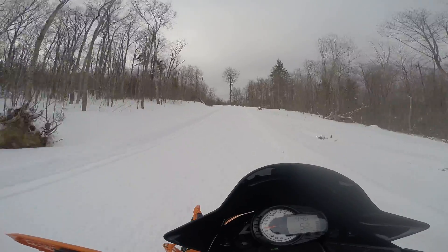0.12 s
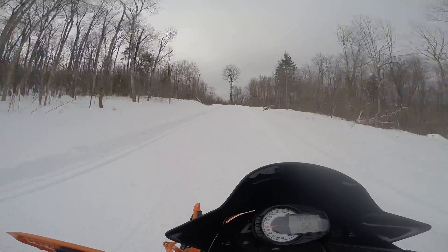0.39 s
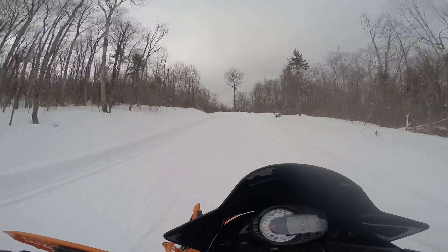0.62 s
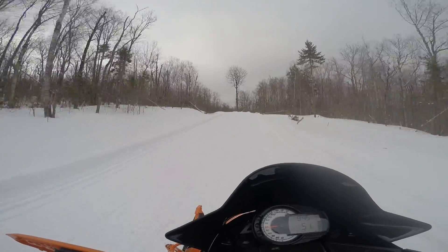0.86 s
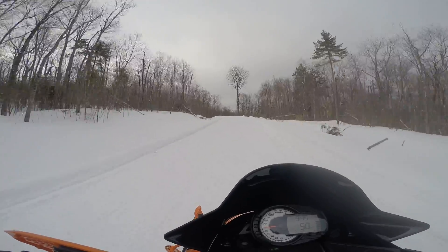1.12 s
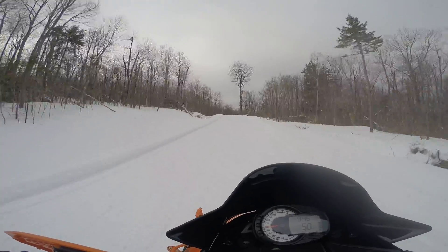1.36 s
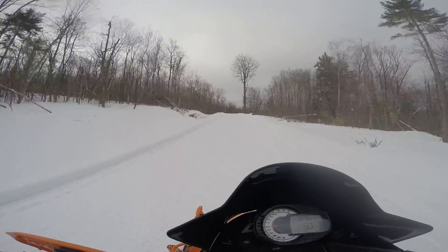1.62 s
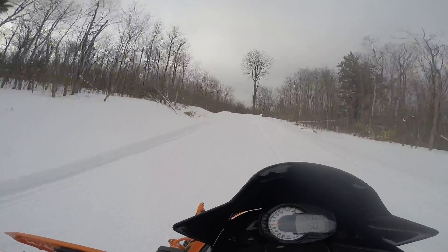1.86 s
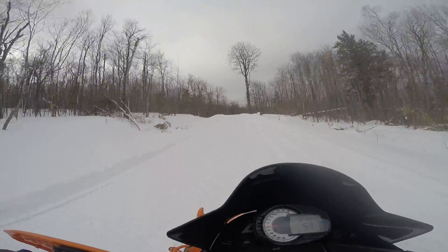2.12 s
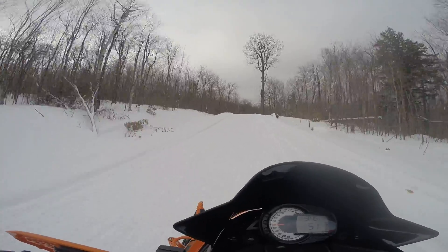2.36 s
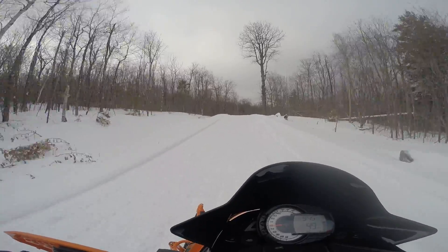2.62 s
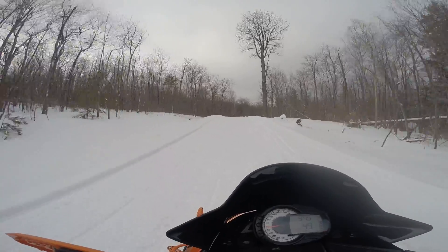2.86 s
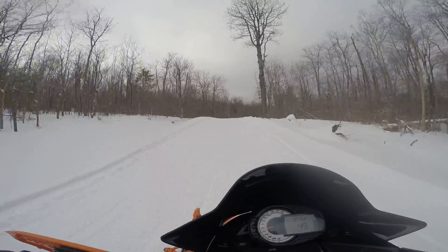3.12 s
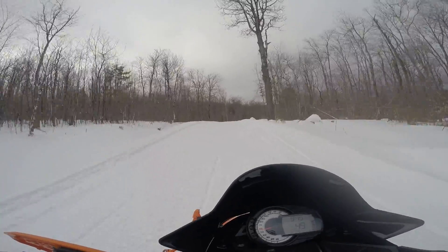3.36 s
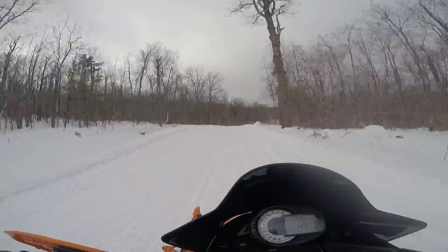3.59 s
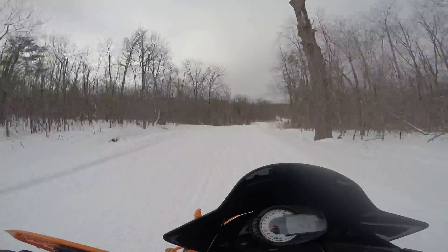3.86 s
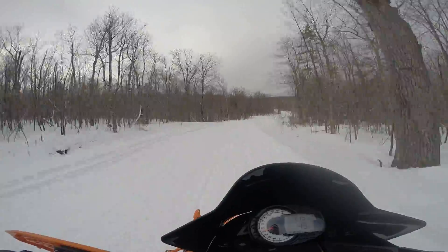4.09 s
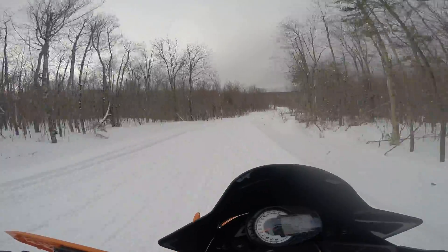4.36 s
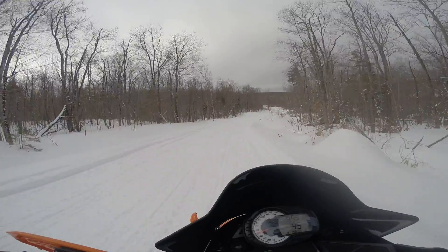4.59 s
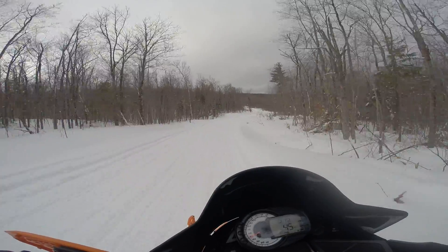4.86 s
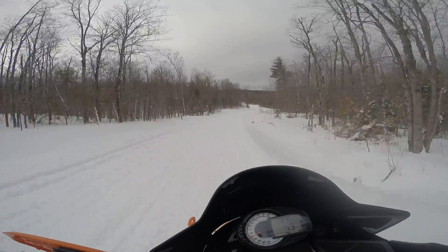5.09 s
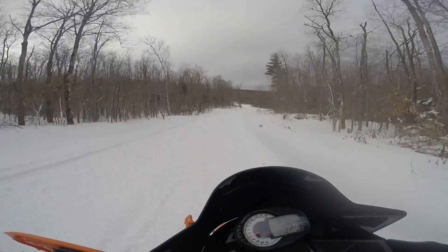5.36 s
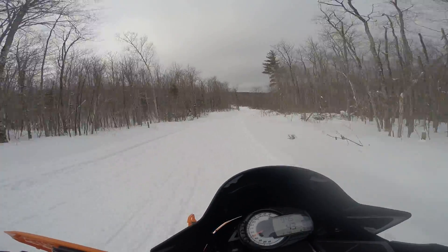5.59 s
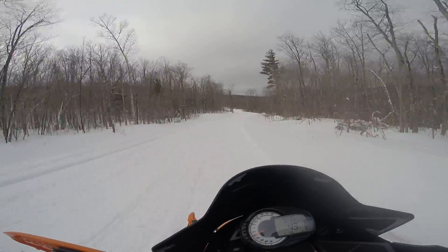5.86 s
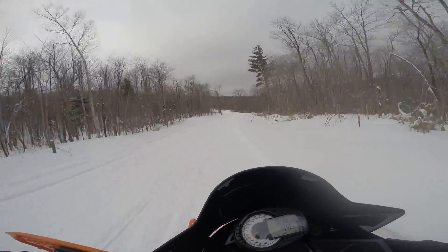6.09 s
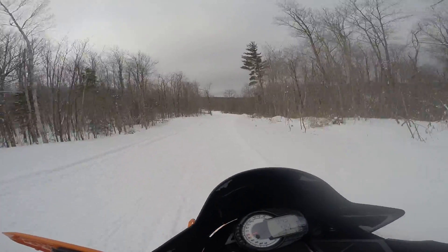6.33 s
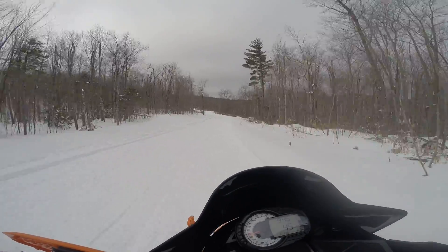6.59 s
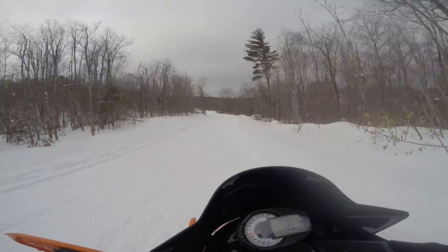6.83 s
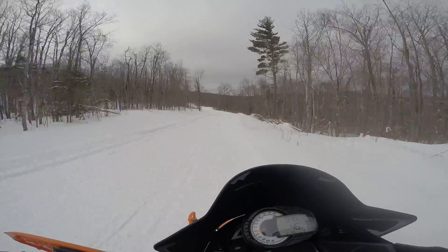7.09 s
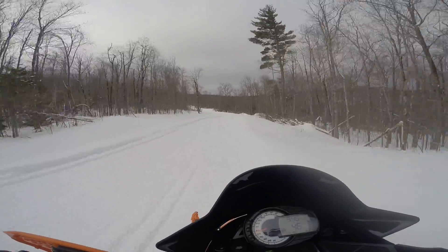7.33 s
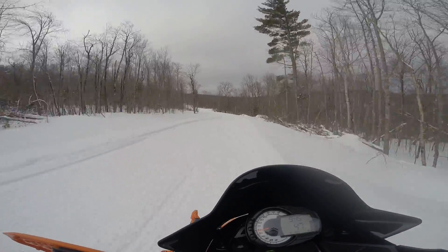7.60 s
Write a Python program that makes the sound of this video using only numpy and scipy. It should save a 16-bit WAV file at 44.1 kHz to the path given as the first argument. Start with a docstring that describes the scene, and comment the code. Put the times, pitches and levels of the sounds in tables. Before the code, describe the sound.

A two-stroke snowmobile is already cruising as the sound begins, heard through a sealed camera housing on the rider: dense low drone, boxy boom, throaty midrange rasp, soft hiss and buffeting wind. Track lugs hum and the drive whines faintly. Brittle little ticks and short chatters come from a loose mount, especially from 1.7 to 3 s. Bumps knock at about 0.6, 1.2, 2.1, 3.1 and 3.3 s. Pitch rises slightly near 1.5 s, then sags from 3 s. At about 3.6 s the throttle closes: roar and wind thin, leaving a lower, clean, prominent hum, lowest around 5.1 s with tiny stutters and a gust. Fine chatter buzzes at 5.4-5.8 s as revs climb. Near 5.9 s the rough roar returns with stronger whine, gusts and ticks; jolts hit at 6.2 and, hardest, 7.1 s. Cruising continues until an abrupt end at 7.7 s.

```python
"""Snowmobile on a snowy trail

A two-stroke twin, heard by a camera in a sealed housing on the rider. The throttle closes and reopens.
Wind, housing boom, body rumble, roar and hiss are filtered noise; the roar also holds crank overtones.
Crank tones, track lugs and drive whine are unsteady sines gliding on tabled speeds.
Trail jolts are impulses with decaying noise; the loose camera mount ticks in short bursts of ringing."""
import sys
import numpy as np
from scipy import signal
from scipy.fft import rfft, irfft, next_fast_len
from scipy.io import wavfile
from scipy.ndimage import uniform_filter1d, minimum_filter1d, map_coordinates

SR = 44100
rng = np.random.default_rng(int(sys.argv[2]) if len(sys.argv) > 2 else 0)


def convert_level_to_amplitude(level_db):
    """Map a level in decibels to its linear amplitude factor."""
    exponent = np.asarray(level_db, float) / 20
    return 10 ** exponent


def materialize(psi):
    """Save the field psi as 16-bit PCM at rate SR to the path in sys.argv[1].

    A 1-D psi becomes a single channel; in a 2-D psi each row is a channel.
    """
    bounded = np.clip(np.atleast_2d(psi).T, -1, 1)
    quanta = np.round(bounded * 32767).astype(np.int16)
    wavfile.write(sys.argv[1], SR, quanta)


N = 339999  # samples

# wind and housing spectra: freq_hz, relative_db
WIND_SPECTRUM = [(12, -26.5), (22, -11.5), (32, -1.5), (46, 3), (65, -6.5), (90, -4.5), (125, -9.5),
                 (200, -36)]
BOOM_SPECTRUM = [(80, -20.5), (120, -12), (140, -1), (165, 9), (185, 3), (220, -7.5), (290, -14),
                 (340, -16.5), (420, -28.5), (520, -45.5)]
BODY_SPECTRUM = [(250, -25), (350, 9), (430, 3), (550, -3), (680, 1.5), (800, -2), (960, -7.5),
                 (1200, -42.5)]
# engine noise spectra as they reach the microphone: freq_hz, relative_db
ROAR_SPECTRUM = [(900, -40), (970, -34.5), (1050, -12.5), (1150, -13), (1250, -6), (1370, -0.5),
                 (1600, -4.5), (1800, -6), (2000, -14.5), (2200, -14), (2500, -22.5), (3100, -27.5),
                 (3500, -37.5), (4200, -53)]
EDGE_SPECTRUM = [(1850, -28.5), (2050, -8.5), (2200, 4), (2400, -1), (2800, -10.5), (3100, -17),
                 (3500, -31.5)]
HISS_SPECTRUM = [(2800, -17.5), (3500, -1), (4300, -3.5), (4730, -0.5), (5100, -4.5), (5600, 2), (6300, -4),
                 (7300, -6.5), (7800, -13), (10000, -14.5), (11500, -23), (12900, -27.5), (13500, -40.5),
                 (14600, -62)]
# narrow housing resonances that pick overtones out of the roar: freq_hz, gain_db
PICK_SPECTRUM = [(900, -14), (1230, -6.5), (1300, 1.5), (1370, 0.5), (1460, -4), (1580, 5), (1700, -1.5),
                 (2200, 2), (4200, 1.5)]
# gusts on the housing: time_s, rise_over_wind_db
GUSTS = [(0.3, 6.5), (1.31, 4.5), (2.7, 5), (2.96, 3.5), (3.24, 2), (5.11, 8.5), (5.95, 7), (6.18, 5.5),
         (6.51, 4.5), (6.76, 1), (7.11, 2.5), (0.55, 3), (0.8, 1), (3.41, 7.5), (2.3, 3)]
# low housing boom: time_s, level_db
BOOM_LEVEL = [(0, -15), (0.8, -18), (1.4, -18), (2.2, -19), (2.8, -19.5), (3.1, -17.5), (3.46, -16.5),
              (3.62, -24.5), (4.4, -24.5), (4.9, -19.5), (5.2, -18.5), (5.6, -22), (5.95, -17.5),
              (6.4, -19), (7.0, -17.5), (7.71, -18)]
# upper rasp: time_s, level_db
EDGE_LEVEL = [(0, -41), (0.7, -45.5), (1.7, -44), (2.4, -42.5), (3.0, -54.5), (5.5, -52), (6.0, -40.5),
              (6.4, -39), (6.9, -41.5), (7.3, -39), (7.71, -38)]
# engine load: time_s, load_db
LOAD = [(0, -22.5), (0.4, -25), (0.64, -23), (0.88, -27.5), (1.2, -26), (1.7, -25), (2.0, -23.5),
        (2.3, -25), (2.7, -28.5), (3.0, -25), (3.2, -24), (3.48, -23.5), (3.66, -29), (4.0, -29.5),
        (4.5, -29), (4.85, -27.5), (5.1, -26.5), (5.65, -32), (5.95, -24.5), (6.3, -23.5), (6.8, -24.5),
        (7.1, -24), (7.3, -25.5), (7.71, -23.5)]
# brief dips of firing tone and housing boom: time_s, depth_db, bell_sigma_s
STUMBLES = [(3.48, 9, .014), (4.895, 12, .011), (4.988, 11, .012), (5.11, 18, .012), (5.177, 16, .015),
            (5.835, 16, .014)]
# overtones in the roar, before the housing: crank_multiple, relative_db
RASP = [(11, -7), (12, -6), (13, -4), (14, 3), (15, -5), (16, 1), (17, -3), (18, 1), (19, -2), (20, -2),
        (21, -4), (22, -2), (23, 2), (24, -3), (25, -2), (26, -6), (27, 0), (28, -2), (29, -2), (30, 0),
        (31, -1), (32, -3)]
# single mount contacts: time_s, level_db
TICKS = [(0.229, -34), (0.346, -35), (0.407, -34), (0.449, -37), (0.949, -37), (0.99, -36), (1.01, -38),
         (1.069, -35), (1.111, -33), (1.172, -34), (1.311, -37), (1.431, -36), (1.709, -36), (1.807, -34),
         (1.818, -37), (1.863, -37), (1.963, -36), (1.966, -33), (1.987, -34), (2.022, -38), (2.047, -34),
         (2.106, -35), (2.188, -36), (2.289, -32), (2.31, -36), (2.716, -35), (2.798, -36), (2.947, -37),
         (2.972, -34), (2.993, -35), (3.015, -38), (4.067, -39), (4.151, -38), (4.27, -41), (4.341, -42),
         (4.686, -37), (4.76, -40), (5.963, -41), (6.071, -35), (6.373, -35), (6.398, -37), (6.631, -36),
         (6.672, -37), (6.735, -35), (6.756, -35), (6.886, -36), (6.932, -36), (7.004, -37), (7.189, -34),
         (7.22, -39), (7.261, -36), (7.291, -36), (7.393, -40), (7.465, -33), (7.659, -33)]
# spells of mount chatter: start_s, end_s, level_db, chance_first_firing, chance_second_firing
CHATTER = [(0.59, 0.76, -36, .85, .15), (2.35, 2.67, -39, .5, .15), (2.835, 2.915, -37, .9, .2),
           (3.555, 3.735, -40, .6, .2), (3.77, 4.03, -42, .3, .15), (5.43, 5.57, -41, .55, .35),
           (5.57, 5.695, -43, .95, .6), (5.72, 5.825, -40, .65, .5)]
# mount rings: freq_hz, relative_db, bell_sigma_ms
MOUNT = [(6700, -7, .2), (9600, -9, .22), (10800, -8, .24), (12000, -10, .28)]
# trail jolts on the housing: time_s, level_db
JOLTS = [(0.6452, -13), (1.2268, -12), (2.149, -11.5), (3.1496, -9.5), (3.3205, -10), (6.176, -11.5),
         (7.0714, -7.5)]
# track and drive: time_s, lug_rate_hz, lug_tone_db, drive_whine_db
TRACK = [(0.0, 305.7, -31, -33.5), (0.5, 301.6, -31, -35.5), (1.15, 295.0, -30, -35.5),
         (1.6, 296.4, -28, -32), (2.1, 294.7, -29.5, -36), (2.5, 291.8, -30.5, -32.5),
         (3.1, 287.4, -29, -30.5), (3.75, 274.6, -35, -37.5), (4.25, 267.2, -32, -37.5),
         (4.8, 258.1, -36.5, -46), (5.25, 249.6, -37.5, -44.5), (6.1, 259.6, -33, -27),
         (6.6, 267.6, -33, -30.5), (7.0, 272.1, -31, -34.5), (7.4, 276.6, -27.5, -31),
         (7.71, 279.1, -27, -28.5)]
# crank: time_s, crank_hz, once_a_turn_tone_db, firing_tone_db
ENGINE = [(0.0, 97.9, -21, -18.5), (0.56, 97.7, -23, -17), (0.98, 98.3, -23.5, -16.5),
          (1.3, 100.4, -21, -19), (1.54, 101.0, -21, -21.5), (1.9, 100.6, -20, -18), (2.24, 98.4, -24, -17),
          (2.8, 97.9, -24, -17), (3.08, 94.9, -23, -18.5), (3.4, 90.9, -20, -21.5),
          (3.56, 89.1, -24, -14.5), (4.04, 84.4, -29, -12), (4.6, 83.6, -27.5, -12),
          (5.06, 81.2, -25, -11.5), (5.35, 82.6, -28, -11.5), (5.78, 89.3, -24.5, -12),
          (5.9, 91.3, -23, -19), (6.16, 93.9, -22, -21.5), (6.48, 96.4, -22, -17), (6.75, 96.1, -23, -16.5),
          (7.2, 97.9, -22.5, -18.5), (7.71, 97.8, -23, -19.5)]
# once-a-turn shake overtones: crank_multiple, relative_db
SHAKE = [(1, 0), (3, -12)]
# exhaust bark overtones: crank_multiple, relative_db
BARK = [(5, 1), (7, -13), (8, -10), (9, -14)]

CRUISE_LOAD_DB = -26  # load at which the cruise levels hold
# load laws: level_at_cruise_db, gain_db_per_load_db, own_unsteadiness_db
WIND_LAW, BODY_LAW = (-25, 0.94, 0.81), (-42, 0.95, 0.5)
ROAR_LAW, HISS_LAW = (-28, 0.99, 0.67), (-53.5, 1.1, 0.27)
BARK_LAW = (-52, 1.9, 1.2)
GUST_SIGMA_S = 0.036
SWELL_DB = .7  # slow swells shared by boom, body, roar, edge and hiss
THUDS_PER_S, THUD_POWER_SHARE, THUD_SCATTER_DB = 45, .6, 4
CHATTER_SCATTER_DB, CHATTER_SCATTER_S = 2, .0005
WHINE_PER_LUG = 16 / 3
FLUTTER_DB, FLUTTER_DB_PER_LOAD_DB = 1.5, .22  # firing tone roughens under load


def unit(x):
    """Scales to rms 1."""
    return x / np.sqrt(np.mean(x ** 2) + 1e-20)


def curves(rows):
    """Interpolates each column after the time to one value per sample."""
    time_s, *columns = np.transpose(rows)
    return [np.interp(np.arange(N) / SR, time_s, column) for column in columns]


def wobble(knots_per_s):
    """Smooth random curve: a spline through random knots."""
    knots = rng.standard_normal(int(N / SR * 200))
    return map_coordinates(knots, [np.arange(N) * knots_per_s / SR])


def bells(rows):
    """Sum of Gaussian bumps from time_s, height_db, sigma_s rows."""
    t = np.arange(N) / SR
    return sum(db * np.exp(-.5 * ((t - s) / sigma_s) ** 2) for s, db, sigma_s in rows)


def follows_load(law, knots_per_s):
    """Level in dB of a layer that grows with load and wavers on its own."""
    cruise_db, db_per_load_db, own_db = law
    extra_load_db = curves(LOAD)[0] - CRUISE_LOAD_DB
    return cruise_db + db_per_load_db * extra_load_db + own_db * wobble(knots_per_s)


def coloured(x, spectrum):
    """Minimum-phase filter through freq_hz, gain_db points; the cepstrum is folded to be causal."""
    size = 2 * next_fast_len(N // 2 + SR // 4)
    freq_hz, gain_db = np.transpose(spectrum)
    log_hz = np.log(np.fft.rfftfreq(size, 1 / SR) + 1)
    grid_db = np.interp(log_hz, np.log(freq_hz + 1), gain_db, -80, -80)
    cepstrum = irfft(grid_db * np.log(10) / 20, size)
    cepstrum[1:size // 2] *= 2
    cepstrum[size // 2 + 1:] = 0
    response = np.exp(rfft(cepstrum))
    return irfft(rfft(x, size) * response, size)[:N]


def patchy(depth_db):
    """White noise whose gain varies in patches of time and pitch."""
    bins = signal.stft(rng.standard_normal(N), nperseg=512)[2]
    field = uniform_filter1d(rng.standard_normal(bins.shape), size=5, axis=0)
    field = uniform_filter1d(field, size=8, axis=1)
    return signal.istft(bins * convert_level_to_amplitude(depth_db * unit(field)), nperseg=512)[1][:N]


def tone(turns, flutter_db, sway_rad, knots_per_s):
    """Sine of rms 1 on a running phase in turns, unsteady in level and phase."""
    phase = 2 * np.pi * (turns + rng.random()) + sway_rad * wobble(knots_per_s)
    return unit(convert_level_to_amplitude(flutter_db * wobble(knots_per_s)) * np.sin(phase))


def wind():
    """Low turbulence noise buffets the housing and swells in gusts."""
    gusts_db = bells([(s, db, GUST_SIGMA_S) for s, db in GUSTS])
    level_db = follows_load(WIND_LAW, knots_per_s=12) + gusts_db
    return convert_level_to_amplitude(level_db) * unit(coloured(rng.standard_normal(N), WIND_SPECTRUM))


def boom(bumps, swell_db):
    """Ruts knock the housing's low resonance with random pulses over steady noise."""
    pulse_size = -convert_level_to_amplitude(THUD_SCATTER_DB * rng.standard_normal(N))
    thuds = (rng.random(N) < THUDS_PER_S / SR) * pulse_size
    noise = convert_level_to_amplitude(1.1 * bumps) * rng.standard_normal(N)
    knocked = np.sqrt(THUD_POWER_SHARE) * unit(thuds) + np.sqrt(1 - THUD_POWER_SHARE) * noise
    level_db = curves(BOOM_LEVEL)[0] + swell_db - bells(STUMBLES)
    return convert_level_to_amplitude(level_db) * unit(coloured(knocked, BOOM_SPECTRUM))


def body_rumble(bumps, swell_db):
    """Noise in the body's mid resonances, shaken by the trail."""
    level_db = follows_load(BODY_LAW, knots_per_s=11) + swell_db
    noise = convert_level_to_amplitude(0.68 * bumps) * rng.standard_normal(N)
    return convert_level_to_amplitude(level_db) * unit(coloured(noise, BODY_SPECTRUM))


def hiss(bumps, swell_db, throb):
    """Treble noise that throbs with the firings."""
    level_db = follows_load(HISS_LAW, knots_per_s=11) + swell_db
    noise = throb * convert_level_to_amplitude(0.84 * bumps) * patchy(0.68)
    return convert_level_to_amplitude(level_db) * unit(coloured(noise, HISS_SPECTRUM))


def edge(bumps, swell_db, throb):
    """Upper rasp: throbbing noise around 2 kHz on its own level curve."""
    level_db = curves(EDGE_LEVEL)[0] + swell_db
    noise = throb * convert_level_to_amplitude(0.73 * bumps) * patchy(1.6)
    return convert_level_to_amplitude(level_db) * unit(coloured(noise, EDGE_SPECTRUM))


def roar(bumps, swell_db, throb, turns):
    """Throbbing noise plus high crank overtones picked out by housing resonances."""
    level_db = follows_load(ROAR_LAW, knots_per_s=11) + swell_db
    noise = throb * convert_level_to_amplitude(0.82 * bumps) * patchy(1.2)
    rasp = sum(convert_level_to_amplitude(db) * tone(k * turns, flutter_db=3, sway_rad=.35, knots_per_s=6) for k, db in RASP)
    picked = coloured(rasp, PICK_SPECTRUM)
    mix = unit(coloured(noise, ROAR_SPECTRUM)) + convert_level_to_amplitude(-3) * unit(coloured(picked, ROAR_SPECTRUM))
    return convert_level_to_amplitude(level_db) * mix


def rush():
    """Broadband layers: all but the wind share trail bumps and swells; hiss, edge and roar throb."""
    swell_db = SWELL_DB * wobble(9)
    bumps = wobble(16) + wobble(32) + 1.5 * wobble(75)
    turns = np.cumsum(curves(ENGINE)[0]) / SR
    throb = 1 + .13 * np.cos(2 * np.pi * turns) + .15 * np.cos(4 * np.pi * turns + .8)
    low = wind() + boom(bumps, swell_db) + body_rumble(bumps, swell_db)
    high = hiss(bumps, swell_db, throb) + edge(bumps, swell_db, throb)
    return low + high + roar(bumps, swell_db, throb, turns)


def chatter():
    """Mount contacts by chance at the firings inside each spell, as time_s, level_db."""
    firings = 2 * np.cumsum(curves(ENGINE)[0]) / SR
    firing_s = np.searchsorted(firings, np.arange(int(firings[-1]))) / SR
    luck = rng.random(len(firing_s))
    size, shift = rng.standard_normal((2, len(firing_s)))
    contact_s = firing_s + CHATTER_SCATTER_S * shift
    rows = []
    for start_s, end_s, level_db, *chance in CHATTER:
        inside = (firing_s > start_s) & (firing_s < end_s)
        hit = inside & (luck < np.resize(chance, len(firing_s)))  # the two chances alternate
        rows += zip(contact_s[hit], (level_db + CHATTER_SCATTER_DB * size)[hit])
    return rows


def mount():
    """Each contact of the loose part is a tiny swell and fade of the same rings."""
    out, t = np.zeros(N + SR), np.arange(-40, 41) / SR
    contacts = TICKS + chatter()
    scatter_db = rng.standard_normal((len(contacts), len(MOUNT)))
    for (s, level_db), ring_scatter_db in zip(contacts, scatter_db):
        for (hz, ring_db, sigma_ms), extra_db in zip(MOUNT, ring_scatter_db):
            swell = np.exp(-.5 * (1000 * t / sigma_ms) ** 2)
            ring = swell * np.sin(2 * np.pi * hz * t)
            out[round(s * SR) - 40:][:len(t)] += convert_level_to_amplitude(level_db + ring_db + extra_db) * ring
    return out[:N]


def jolts():
    """Each jolt is a sharp blow and a short rattle in the housing's upper resonance."""
    bursts, t = np.zeros(N + SR), np.arange(SR // 10) / SR
    noise = rng.standard_normal((len(JOLTS), len(t)))
    for (s, level_db), rattle in zip(JOLTS, noise):
        start = round(s * SR)
        bursts[start] += convert_level_to_amplitude(level_db + 27)
        bursts[start:][:len(t)] += convert_level_to_amplitude(level_db + 10 - 60 * t / .05) * rattle  # falls 60 dB in 50 ms
    return coloured(bursts[:N], ROAR_SPECTRUM)


def track():
    """Lugs slap past the rails; the drive whines at a fixed ratio above them."""
    lug_hz, lug_db, whine_db = curves(TRACK)
    lugs = np.cumsum(lug_hz) / SR
    slap = tone(lugs, flutter_db=1.6, sway_rad=.3, knots_per_s=22)
    whine = tone(WHINE_PER_LUG * lugs, flutter_db=1.8, sway_rad=.22, knots_per_s=10)
    return convert_level_to_amplitude(lug_db) * slap + convert_level_to_amplitude(whine_db) * whine


def engine():
    """Two firings a turn: clean low tones and a bark that grows with load."""
    crank_hz, turn_db, firing_db = curves(ENGINE)
    turns = np.cumsum(crank_hz) / SR
    extra_load_db = curves(LOAD)[0] - CRUISE_LOAD_DB
    rough_db = np.maximum(0, FLUTTER_DB + FLUTTER_DB_PER_LOAD_DB * extra_load_db)
    firing = tone(2 * turns, flutter_db=rough_db, sway_rad=.12, knots_per_s=24)
    firing = firing + convert_level_to_amplitude(-32) * tone(4 * turns, flutter_db=1.5, sway_rad=.25, knots_per_s=12)
    shake = sum(convert_level_to_amplitude(db) * tone(k * turns, flutter_db=1.3, sway_rad=.2, knots_per_s=14) for k, db in SHAKE)
    bark = sum(convert_level_to_amplitude(db) * tone(k * turns, flutter_db=1.2, sway_rad=.22, knots_per_s=11) for k, db in BARK)
    bark_db = follows_load(BARK_LAW, knots_per_s=0.85)
    return convert_level_to_amplitude(firing_db - bells(STUMBLES)) * firing + convert_level_to_amplitude(turn_db) * shake + convert_level_to_amplitude(bark_db) * bark


def scene():
    """Sums all sources at one microphone."""
    return (rush() + mount() + jolts() + track() + engine())[None]


def roll_off(x):
    """The treble ends steeply here."""
    return signal.sosfilt(signal.butter(12, 14990, fs=SR, output="sos"), x)


def record(dry):
    """The microphone saturates a little, a limiter holds the loudest swings and the end fades."""
    bent = dry - .11 * dry ** 3
    needed_gain = np.minimum(1, 0.93 / (np.abs(bent) + 1e-9))
    held_gain = minimum_filter1d(needed_gain, size=1323, axis=1)  # 30 ms
    gain = uniform_filter1d(held_gain, size=1323, axis=1)
    fade = np.minimum(1, np.arange(N)[::-1] / SR / .006)  # 6 ms
    return roll_off(bent * gain * fade)


dry = scene()
out = record(dry)
materialize(out)
```